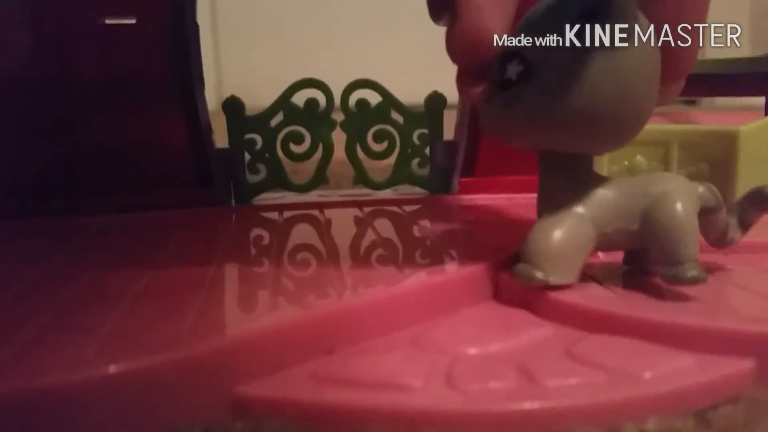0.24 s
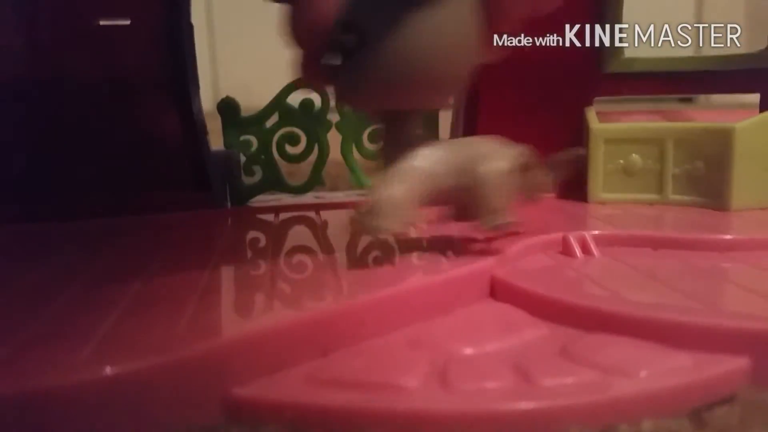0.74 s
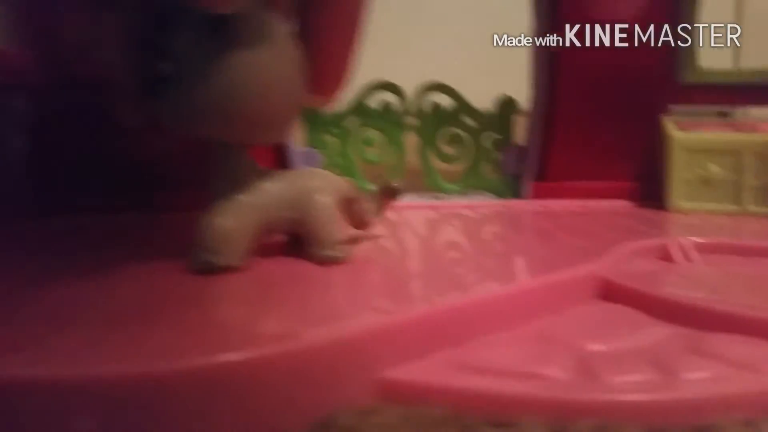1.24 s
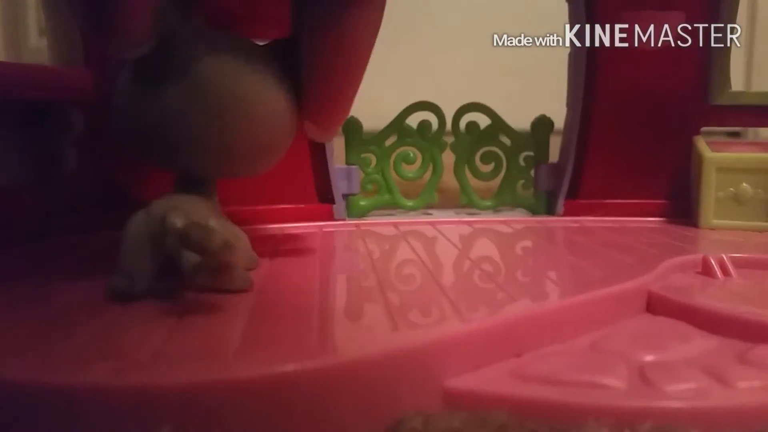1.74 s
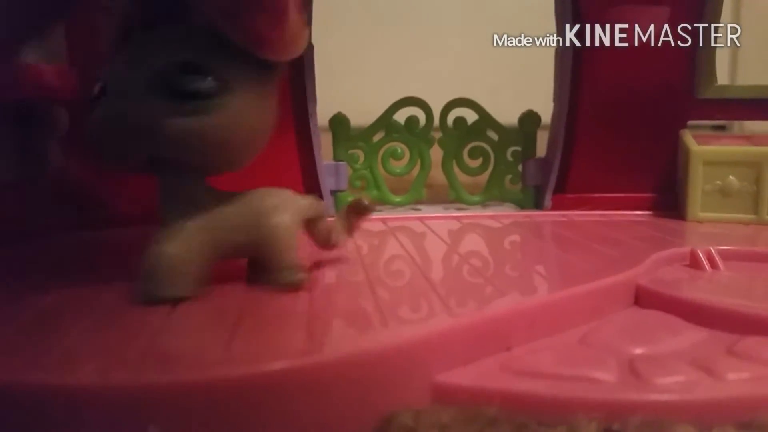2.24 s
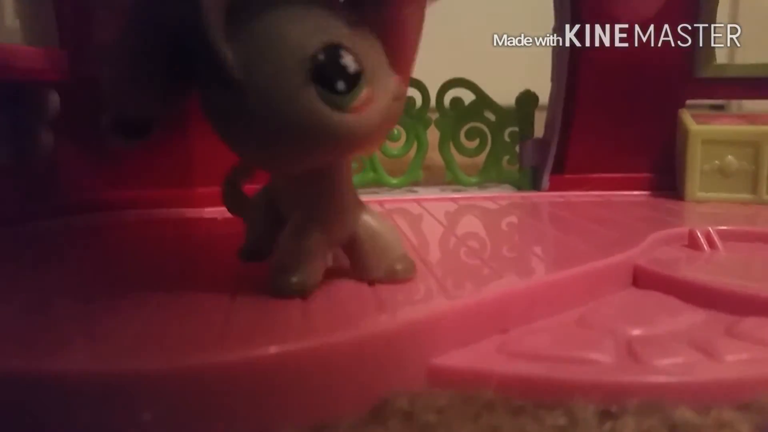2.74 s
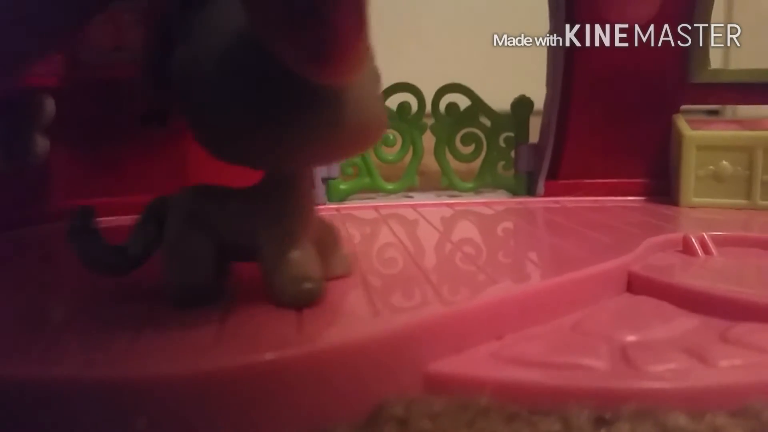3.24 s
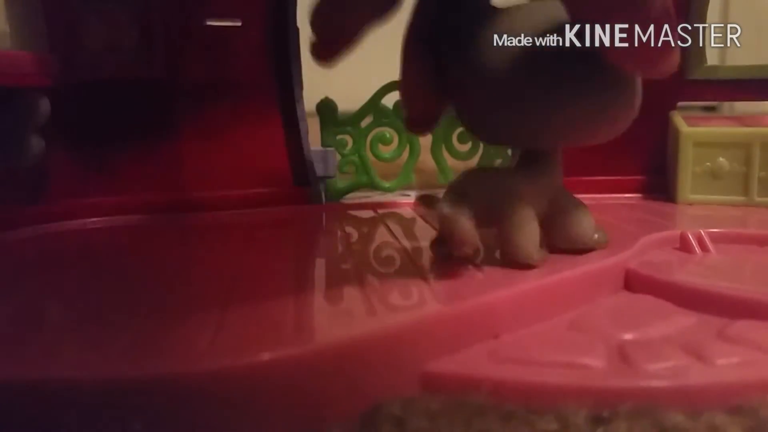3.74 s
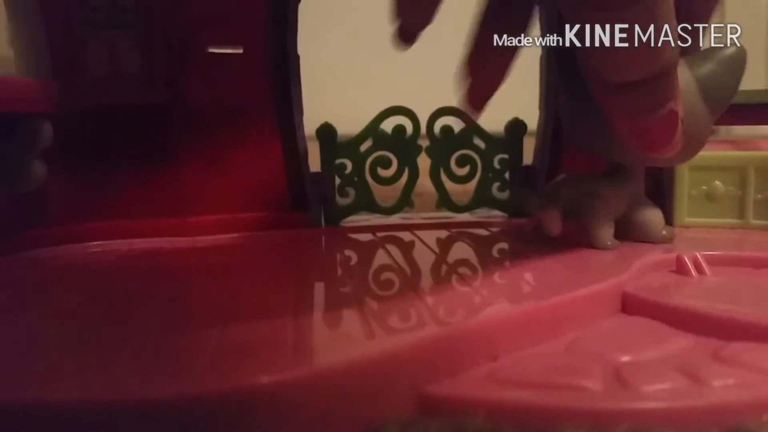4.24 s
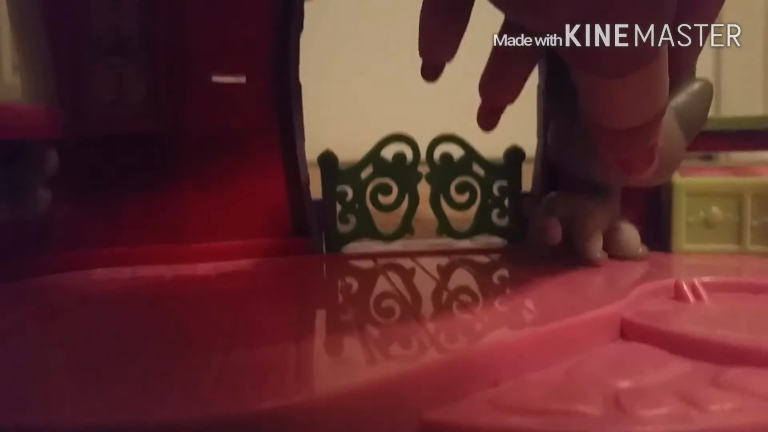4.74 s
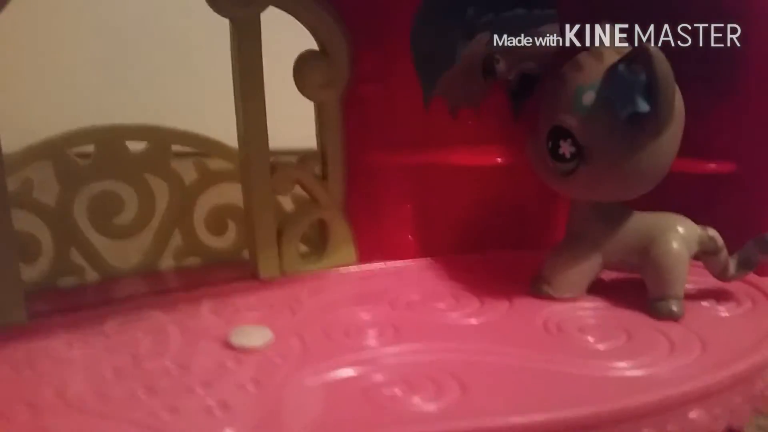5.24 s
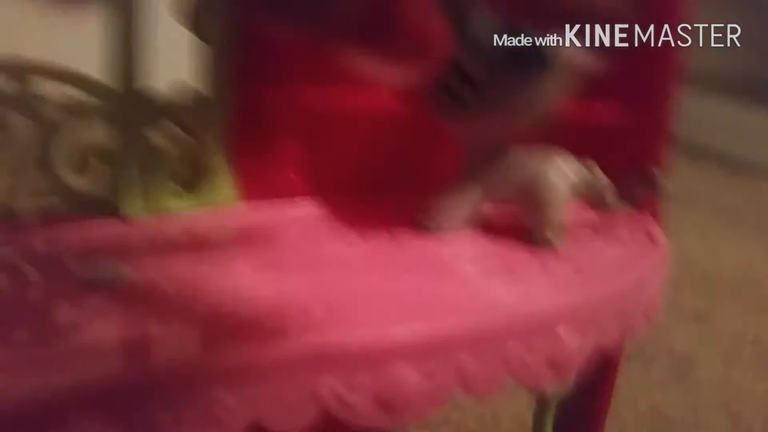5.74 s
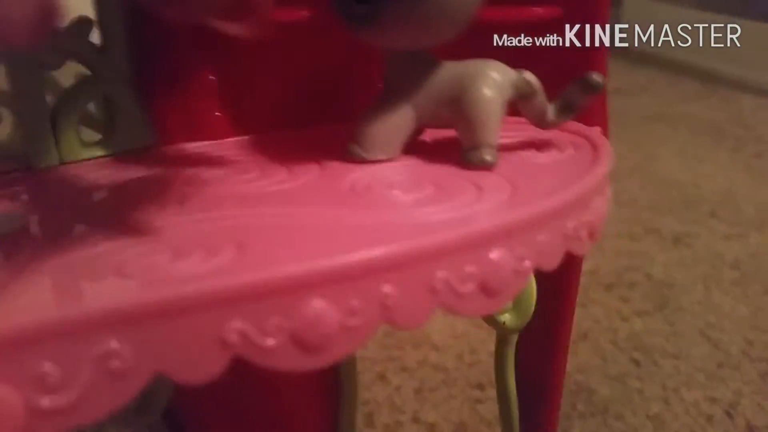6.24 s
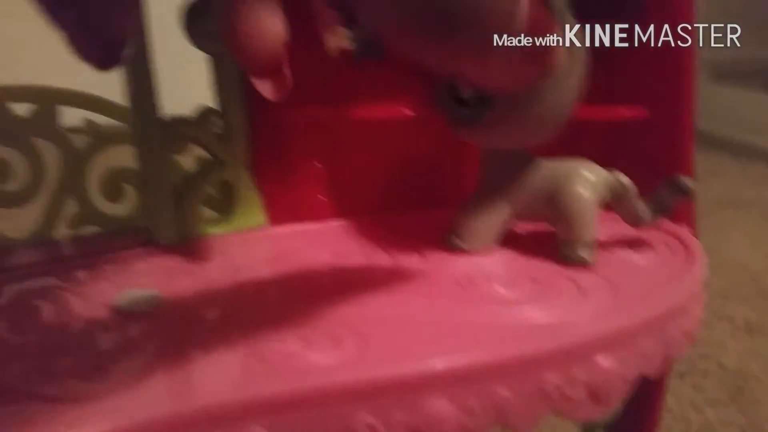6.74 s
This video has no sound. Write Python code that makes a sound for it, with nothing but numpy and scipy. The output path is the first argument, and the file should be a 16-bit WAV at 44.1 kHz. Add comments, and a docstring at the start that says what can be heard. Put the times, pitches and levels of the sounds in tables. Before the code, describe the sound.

A hollow plastic toy hops and clatters over a hollow plastic deck in a small room, with carpet swishes and finger bumps on the camera.

```python
"""A small room, heard from a camera with two microphones: shaped noise for its low rush and fine hiss, sines for hum.
At once a sleeve sweeps over the carpet (swelling noise); from 0.35 s a hollow plastic toy is hopped by hand over
a hollow plastic deck nearer the left microphone, its feet clattering in quick bursts (ringing modes under cracks).
From 0.7 s fingers bump the camera by its right microphone (pressure pulses); from 1.05 s come jolts (dying sines)
and ticks (snaps with chatter), from 4.2 s rubs (grainy noise). At 5.76 s rush and hum drop quickly and stay low."""
import sys
import numpy as np
from scipy import signal
from scipy.fft import rfft, irfft, next_fast_len
from scipy.io import wavfile
from scipy.ndimage import map_coordinates

SR = 44100
rng = np.random.default_rng(int(sys.argv[2]) if len(sys.argv) > 2 else 0)


def unload_wav(signal):
    """Save mono or channel-first audio to the path in sys.argv[1] as 16-bit WAV at rate SR, clipped to [-1, 1]."""
    wavfile.write(
        sys.argv[1],
        SR,
        np.round(np.clip(np.atleast_2d(signal).T, -1, 1) * 32767).astype(np.int16),
    )


N = 307950
TIME = np.arange(N) / SR  # s

# In every table, left-right levels are positive when the left microphone is louder.
# colour of the room's low rush: (f/Hz, density/dB per Hz)
RUSH_COLOUR = [(12, -58), (20, -9.5), (53, -2.5), (87, -3.5), (123, -1.5), (181, -7), (292, -10.5),
               (386, -13.5), (523, -14), (771, -21.5), (917, -23), (1270, -34), (1750, -32), (3500, -49.5),
               (4550, -82.5), (7700, -120)]
# likeness of the rush at the two microphones: (f/Hz, correlation)
RUSH_LIKENESS = [(30, 0.18), (60, 0.066), (130, 0.65), (290, 0.87), (640, 0.43), (1400, .06), (3000, 0.065)]
# balance of the rush: (f/Hz, left-right level/dB)
RUSH_BALANCE = [(40, -14.5), (110, 0), (200, 6), (400, 7), (700, 3.5), (1400, 1), (3000, 5)]
# mains hum: (f/Hz, level/dB)
HUM_TONES = [(120, -48), (240, -56), (291, -63.5), (425, -61)]
# colour of the fine hiss: (f/Hz, density/dB per Hz)
HISS_COLOUR = [(1200, -36), (2500, -2), (3500, -0.5), (5200, -0.5), (7000, -4.5), (8700, -16.5),
               (10500, 0.5), (12800, 1.5), (15300, -7), (15600, -48.5)]
# course of the fine hiss: (t/s, level/dB)
HISS_COURSE = [(0, -66), (2.45, -65.5), (2.95, -69.5), (3.25, -64.5), (3.6, -68), (4.88, -67),
               (5.02, -76.5), (5.58, -80), (5.74, -64), (6.0, -84), (6.33, -85), (6.7, -101), (6.98, -73)]
# sleeve over carpet: (t of greatest speed/s, rise/s, fall/s, level/dB)
SLEEVE_SWEEPS = [(0.015, .1, 0.13, -38.5), (1.199, 0.18, 0.36, -38.5), (1.95, 0.24, .8, -65.5)]
# colour of the carpet pile: (f/Hz, density/dB per Hz)
PILE_COLOUR = [(300, 2), (530, -1), (900, -9), (1470, -4.5), (1930, -8), (2220, -3), (2720, -10.5),
               (6820, -10), (8440, -18), (10800, -7), (15500, -16)]
# one foot touches down: (t/s, level/dB, brightness/dB)
FOOT_STEPS = [(0.347, -29, -16), (0.687, -19, 4.5), (0.912, -19.5, 1), (0.941, -26.5, 0),
              (1.236, -20.5, 6.5), (2.047, -25.5, 11.5), (2.199, -31.5, 6), (2.290, -24.5, 2),
              (2.394, -17.5, 4.5), (2.4705, -17, 4), (2.701, -25.5, -9), (2.949, -27, 2), (3.015, -25, 0),
              (3.101, -27, -1), (3.190, -29.5, -4), (3.543, -20, 1.5), (3.813, -27, -1), (3.8365, -11.5, 5),
              (3.9085, -17, -2), (4.404, -19.5, 9.5), (5.272, -25.5, 6), (6.312, -40, -4)]
# the toy lands and rocks from foot to foot:
# (t/s, level/dB, brightness/dB, crack level/dB, contacts, gap/s, change per contact/dB)
TOY_HOPS = [(0.570, -11, 1, -16.5, 4, 0.011, 2.04), (0.8234, -7.5, -1.5, -19, 4, 0.011, -0.38),
            (1.137, -7.5, 5, -12, 2, .019, -0.5), (3.473, -9.5, 0.5, -19.5, 2, .012, -5),
            (3.7233, -9.5, 0.5, -18, 6, .0093, -2), (3.945, -11, 1.5, -19.5, 2, .021, -7)]
# modes of the hollow deck: (f/Hz, relative level/dB, t60/s)
DECK_MODES = [(313, -17, 0.11), (405, -10.5, 0.063), (498, -9.5, 0.13), (562, -0.5, 0.073),
              (612, -2, 0.073), (742, -7.5, 0.085), (824, -13, 0.058), (887, -4.5, 0.072), (980, -8, 0.066),
              (1117, -13, 0.056), (1224, -12.5, 0.054), (1450, -19, 0.015), (1612, -11, .035),
              (1751, -6.5, 0.045), (1817, -16.5, 0.063), (1960, -13.5, 0.019), (2190, -14.5, .035)]
# colour of a foot's crack on the deck: (f/Hz, density/dB per Hz)
CRACK_COLOUR = [(300, -26), (1200, -10), (2200, 7), (3200, 4), (5200, -1), (6800, -1.5), (8500, -10),
                (11000, -1), (14000, -8), (16500, -21)]
# modes of the hollow toy's own shell: (f/Hz, relative level/dB, t60/s)
SHELL_MODES = [(5234, -0.5, 0.015), (6500, -2, 0.017), (6915, -1, 0.012), (8200, -7.5, 0.013),
               (10870, -4, 0.011), (12800, 2.5, 0.0084)]
# decay of the room: (f/Hz, t60/s)
ROOM_DECAY = [(150, 0.5), (600, 0.26), (2000, 0.18), (7000, 0.26), (14000, 0.12)]
# fingers bumping the camera body: (t/s, relative level/dB, contact time/ms)
FINGER_BUMPS = [(0.692, -17, 2.2), (1.0482, -7, 0.58), (1.832, -10, 3.2), (2.564, -11, 8.6),
                (3.889, 1, 1.16), (3.897, -2, 2.45), (3.989, 1, 1.84), (4.046, -1, 2.37),
                (4.2394, 0.5, 1.1), (4.305, -0.5, 1.8), (4.4195, -13, 0.42), (4.438, 0, 1.73),
                (4.460, -5.5, 0.94), (5.01, -19.5, 2.4), (5.119, -15, 3.5), (5.21, -11.5, 2.5),
                (5.291, -18.5, 3.6), (5.451, -19, 3.2), (5.642, -15.5, 2.4), (5.656, -3, 0.74),
                (5.699, -2.5, 1.26), (5.922, -23, 1.7), (6.067, -28, 1.5), (6.329, -24, 2.1),
                (6.410, -28, 1.37), (6.577, -11.5, 2.17)]
# firm jolts leave the camera rocking or the playset ringing, one sine a row, three for the jolt at 1.05 s:
# (t/s, level/dB, f/Hz, t60/s, left-right level/dB)
SWAYS = [(1.049, -19, 39, 0.23, -22.5), (1.048, -28.5, 166, 0.17, 11), (1.049, -31.5, 272, 0.51, 10.5),
         (4.339, -21.5, 78, 0.29, -22), (5.699, -27, 251, 0.33, 30)]
# nails and casing ticking beside the microphone: (t/s, relative level/dB, treble/dB)
CASING_TICKS = [(1.0484, -24, -1), (3.89, -20, -10), (4.221, -29, -1), (4.24, -22, -20), (4.270, -23, 6),
                (4.2981, -33, 4), (4.3356, -21.5, 1.5), (4.418, -28.5, 15), (4.436, -21.5, -10),
                (4.4597, -15.5, 1.5), (4.869, -40, 3), (5.252, -36.5, -10), (5.2717, -23, -2),
                (5.306, -36, -10), (5.641, -27, -3.5), (5.658, -20.5, -4.5), (5.696, -7.5, 11),
                (5.766, -25.5, -3.5), (5.919, -26.5, -5), (6.083, -44.5, -16), (6.187, -37.5, -24),
                (6.487, -38, -23.5), (6.915, -41.5, -12)]
# colour of a tick through the casing: (f/Hz, density/dB per Hz)
CASING_COLOUR = [(100, -1.5), (400, 16), (1000, 3), (1400, 1.5), (2000, 0), (2450, -3.5), (2950, -24),
                 (5400, -18), (6600, -25), (8500, -35), (12000, -24), (16000, -31)]
# a finger slides on the casing: (start t/s, length/s, level/dB)
FINGER_RUBS = [(4.217, 0.19, -54), (4.40, 0.04, -50), (5.122, 0.066, -43.5), (5.257, .055, -56.5),
               (5.65, 0.038, -50.5), (5.723, 0.12, -56.5), (6.10, .24, -62), (6.476, 0.097, -75.5),
               (6.914, 0.043, -66.5)]
# colour of skin on the casing: (f/Hz, density/dB per Hz)
SKIN_COLOUR = [(90, 6), (300, 3.5), (600, 8), (1100, 4), (1750, 4.5), (2450, -3.5), (2950, -15.5),
               (3600, -12.5), (4400, -20.5), (5300, -11.5), (6500, -21), (7500, -33), (12000, -21.5),
               (16000, -39)]
# colours of the two microphone ports: (f/Hz, left-right level/dB)
PORT_BALANCE = [(1500, 0), (2400, -1.5), (4400, -6), (5800, -6.5), (7000, 7), (8600, 12), (10500, 9),
                (13000, -5), (16000, 7.5)]

RUSH_DB = -42.5  # rush level before it drops
DROP_S, DROP_LENGTH_S, DROP_DB = 5.763, 0.13, 12.5  # rush and hum drop and stay low
# a sweep lies DEPTH under its peak one rise before and one fall after it; a higher shape holds longer
SWEEP_DEPTH_DB, SWEEP_SHAPE = 17, 2.84
ROCK_DB, ROCK_SOFT_DB = 2.5, 10.5  # mid-rock the toy's weight is on the deck: louder, less crack
# a step's crack at 0 dB level and brightness; harder and brighter steps crack more
STEP_CRACK_DB, CRACK_PER_DB, CRACK_PER_BRIGHT = -14.5, 0.64, 0.35
SETTLE_S, SETTLE_DB = 0.015, -13.5  # a second foot settles about this much later, and this much weaker
TOY_PAN_DB = 7.5  # left-right level: the toy is nearer the left microphone
RUB_ATTACK_DB_PER_S, RUB_RELEASE_DB_PER_S = 800, 328.5
TOP_HZ = 15900  # band limit


def amp(db):
    """Decibels to gain."""
    return 10 ** (np.asarray(db) / 20)


def unit(x):
    """Scale to rms 1."""
    return x / np.sqrt(np.mean(x ** 2) + 1e-20)


def blow(x):
    """Scale a short sound to the energy of 3 ms at rms 1."""
    energy = np.sum(np.atleast_2d(x) ** 2, axis=-1).mean()
    return x / np.sqrt(energy / (.003 * SR))


def along(points, hz):
    """Read (f/Hz, value) points on a log frequency axis."""
    f, value = np.transpose(points)
    return np.interp(np.log(hz + 1), np.log(f + 1), value)


def curve(rows):
    """Read (t/s, value) points at every sample."""
    s, value = np.transpose(rows)
    return np.interp(TIME, s, value)


def wobble(rate):
    """A smooth random curve, rate knots a second."""
    knots = rng.standard_normal(int(N * rate / SR) + 4)
    return map_coordinates(knots, [TIME * rate])


def filtered(x, response):
    """Multiply the spectrum of x by a response of frequency."""
    n = x.shape[-1]
    m = next_fast_len(n + 4096)
    return irfft(rfft(x, m) * response(np.fft.rfftfreq(m, 1 / SR)), m)[..., :n]


def noise(colour, shape):
    """Noise of rms 1 with the given colour."""
    return unit(filtered(rng.standard_normal(shape), lambda hz: amp(along(colour, hz))))


def lean(db):
    """Left and right gains that differ by db and have mean 1."""
    half = np.atleast_1d(db) / 2
    gains = amp(np.array([half, -half]))
    return gains / gains.mean(axis=0)


def add(track, s, sound):
    """Mix a sound into a track at time s."""
    start = max(round(s * SR), 0)
    part = track[..., start:][..., :sound.shape[-1]]
    part += sound[..., :part.shape[-1]]


def butter(x, order, hz, kind):
    """Butterworth filter of the given kind."""
    return signal.sosfilt(signal.butter(order, hz, kind, fs=SR, output="sos"), x)


def background(dull_hz=300, dulling=0.41, flicker_db=2.1):
    """Low rush, partly shared by both microphones, unsteady hum and flickering hiss; the rush dulls as it drops."""
    drop_db = -DROP_DB * np.clip((TIME - DROP_S) / DROP_LENGTH_S, 0, 1)

    def mid_side_gains(hz):
        turn = np.arccos(np.clip(along(RUSH_LIKENESS, hz), -1, 1)) / 2
        return np.array([np.cos(turn), np.sin(turn)])

    mid, side = filtered(noise(RUSH_COLOUR, (2, N)), mid_side_gains)
    stereo = np.array([mid + side, mid - side])
    rush = unit(filtered(stereo, lambda hz: lean(along(RUSH_BALANCE, hz))))
    low = filtered(rush, lambda hz: 1 / (1 + (hz / dull_hz) ** 2))
    rush = low + (rush - low) * amp(dulling * drop_db)

    hum = np.zeros(N)
    for hz, db in HUM_TONES:
        level = amp(db + 3.33 * wobble(4)) * np.sqrt(2)
        hum += level * np.sin(2 * np.pi * hz * TIME + hz / 500 * wobble(4.2))

    hiss_level = amp(curve(HISS_COURSE) + flicker_db * wobble(9))
    hiss = hiss_level * noise(HISS_COLOUR, (2, N))
    return amp(drop_db) * (amp(RUSH_DB) * rush + hum) + hiss


def brush(grain_db=1):
    """Countless fibres flick past each other in a wide, soft hiss that swells and fades with each sweep."""
    speed = np.zeros(N)
    for s, rise, fall, db in SLEEVE_SWEEPS:
        distance = np.abs((TIME - s) / np.where(TIME < s, rise, fall))
        speed += amp(db - SWEEP_DEPTH_DB * distance ** SWEEP_SHAPE)
    return speed * amp(grain_db * wobble(120)) * noise(PILE_COLOUR, (2, N))


def room(x):
    """A fresh diffuse tail for each microphone; the bass lasts longest."""
    hz, t, z = signal.stft(rng.standard_normal((2, SR // 3)), SR, nperseg=256)
    decay = amp(-60 * t / along(ROOM_DECAY, hz)[:, None])
    build_up = 1 - np.exp(-t / .008)
    tail = signal.istft(z * decay * build_up, SR, nperseg=256)[1]
    return signal.fftconvolve(x[None], tail / np.linalg.norm(tail[0]), axes=1)


def contacts():
    """Foot contacts (t/s, level/dB, brightness/dB, crack level/dB): settling steps and evenly paced rocking hops."""
    touches = []
    for s, db, bright in FOOT_STEPS:
        crack = STEP_CRACK_DB + CRACK_PER_DB * db + CRACK_PER_BRIGHT * bright
        touches.append((s, db, bright, crack))
        touches.append((s + SETTLE_S * rng.uniform(0.46, 1.3), db + SETTLE_DB, bright, crack))
    for s, db, bright, crack, count, gap, change_db in TOY_HOPS:
        for k in range(count):
            weight = np.sin(np.pi * k / (count - 1))
            level = db + k * change_db + ROCK_DB * weight
            touches.append((s + k * gap, level, bright, crack - ROCK_SOFT_DB * weight))
    return touches


def feet(ring_db=-7, crack_db=-5.0, shell_db=-6, room_db=-15, crack_t60=0.02, lead=0.00014, heel_db=-5,
         body_db=8):
    """Each foot lands on a new spot of the deck, so its modes ring at new strengths under a hard little crack."""
    out, t = np.zeros((2, N)), np.arange(SR // 8) / SR
    hz, mode_db, t60 = np.transpose(DECK_MODES)[:, :, None]
    upper = np.clip(np.log2(hz / 800), 0, 1)  # brightness lifts the upper modes
    arrival = t - np.array([0, lead])[:, None, None]  # the left microphone is nearer
    onset = (.5 + np.exp(-t / .006)) * (1 - np.exp(-t / .0008))
    for s, db, bright_db, hard_db in contacts():
        light = np.clip(-(db + 3.5) / 12, 0, 1)  # light steps bring out the lowest modes
        spot_db = 2 * rng.standard_normal(hz.shape)
        strength = amp(mode_db + upper * bright_db + body_db * light * (hz < 520) + spot_db)
        pitch = hz * (1 + .006 * rng.standard_normal(hz.shape))
        phase = rng.uniform(0, 2 * np.pi, hz.shape) + hz / 2500 * rng.standard_normal((2, len(hz), 1))
        modes = strength * amp(-60 * t / t60) * np.sin(2 * np.pi * pitch * arrival + phase)
        ring = blow(onset * modes.sum(axis=1))

        heel = t - rng.uniform(0.0047, 0.006)  # the rest of the foot follows a moment later
        contact = amp(-60 * t / crack_t60) * (1 - np.exp(-t / 0.00065))
        contact += amp(heel_db - 60 * np.abs(heel) / 0.006) * (heel > 0)
        crack = blow(noise(CRACK_COLOUR, (2, len(t))) * contact)

        shell = np.zeros((2, len(t)))
        for f, level, life in SHELL_MODES:
            decay = amp(level + rng.normal(0, 1.5) - 60 * t / life)
            shell += decay * np.sin(2 * np.pi * (f * t + rng.random((2, 1))))

        hard = crack + amp(shell_db) * blow(shell)
        tap = amp(db + ring_db) * ring + amp(db + hard_db + crack_db) * hard
        add(out, s, tap * lean(TOY_PAN_DB))
        add(out, s, amp(room_db) * room(tap[0]) * lean(TOY_PAN_DB / 2))
    return out


def bumps(level_db=7, corner_hz=62, port_hz=2000, leak_db=-15, rounding=0.29):
    """A soft push on the camera is a pressure pulse at the right port; the bass cut makes it swing back."""
    push, t = np.zeros(N), np.arange(-SR // 20, SR // 20) / SR
    for s, db, contact_ms in FINGER_BUMPS:
        pulse = np.exp(-np.hypot(t / (contact_ms / 1000), rounding))  # flesh rounds the tip
        add(push, s + t[0], -amp(db + level_db) * pulse)
    swing = butter(butter(push, 3, corner_hz, "high"), 3, port_hz, "low")
    far_port = butter(swing, 2, [170, 520], "band")  # only a faint knock crosses the casing
    return np.array([amp(leak_db) * far_port, swing])


def jolts():
    """Each row is one low, dying sine; the jolt at 1.05 s starts three almost together."""
    out, t = np.zeros((2, N)), np.arange(SR // 2) / SR
    for s, db, hz, t60, pan_db in SWAYS:
        sway = amp(db - 60 * t / t60) * np.sin(2 * np.pi * hz * t)
        add(out, s, sway * lean(pan_db))
    return out


def ticks(level_db=-6, t60=.012, pan_db=-12, room_db=-22, direct=4, thinning=0.99):
    """Dry ticks travel through the casing, mostly to the right microphone; the sharpest have the least body."""
    out, t = np.zeros((2, N)), np.arange(-SR // 200, SR // 20) / SR
    for s, db, treble_db in CASING_TICKS:
        chatter = rng.standard_normal(len(t)) * amp(-60 * np.abs(t) / t60) * (t > 0)
        contact = chatter + direct * (t == 0)  # a snap, then fine chatter
        treble = [(2400, 0), (3200, treble_db)]
        body = [(650, -thinning * max(treble_db, 0)), (1000, 0)]
        coloured = filtered(contact, lambda hz: amp(along(CASING_COLOUR, hz) + along(treble, hz)))
        thinned = filtered(blow(coloured), lambda hz: amp(along(body, hz)))
        tick = amp(db + level_db) * thinned
        add(out, s + t[0], tick * lean(pan_db))
        add(out, s + t[0], amp(room_db) * room(tick))
    return out


def rub(pan_db=-12, catch_db=3.5, judder_db=2):
    """Skin catches and slips on the casing in fine grains; each stroke grips fast, holds and lets go."""
    pressure = np.zeros(N)
    for s, length, db in FINGER_RUBS:
        before = np.maximum(s - TIME, 0)
        after = np.maximum(TIME - s - length, 0)
        pressure += amp(db - RUB_ATTACK_DB_PER_S * before - RUB_RELEASE_DB_PER_S * after)
    grip_db = catch_db * wobble(700) + judder_db * wobble(70)
    slips = rng.standard_normal((2, N)) * amp(grip_db)
    grains = unit(filtered(slips, lambda hz: amp(along(SKIN_COLOUR, hz))))
    return pressure * grains * lean(pan_db)


def scene():
    """Room, sleeve, toy and hands at the two microphones."""
    return background() + brush() + feet() + bumps() + jolts() + ticks() + rub()


def record(dry):
    """Each port has its own colour; nothing is kept from the band limit up."""
    return filtered(dry, lambda hz: lean(along(PORT_BALANCE, hz)) * (hz < TOP_HZ))


dry = scene()
out = record(dry)
unload_wav(out)
```